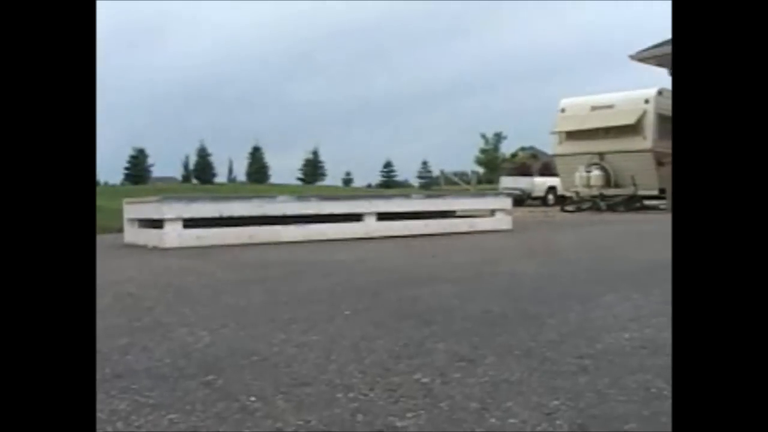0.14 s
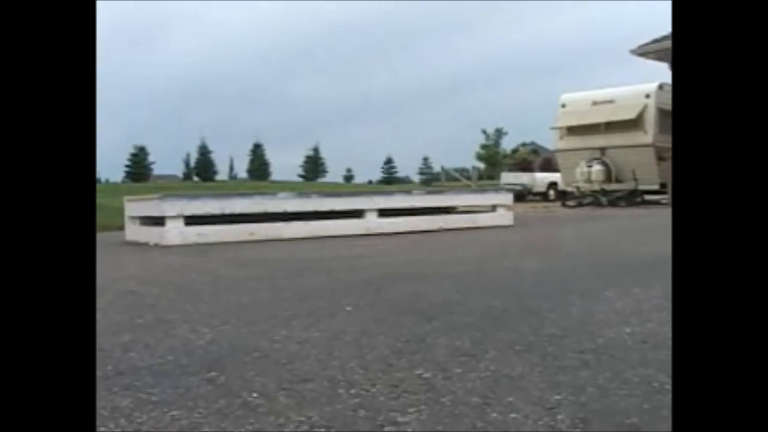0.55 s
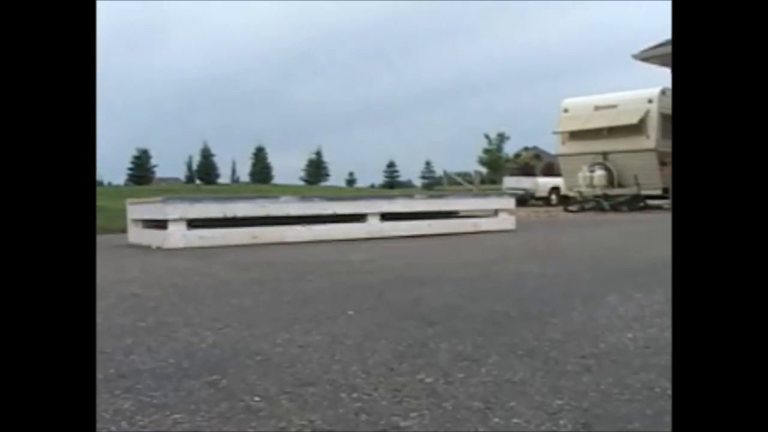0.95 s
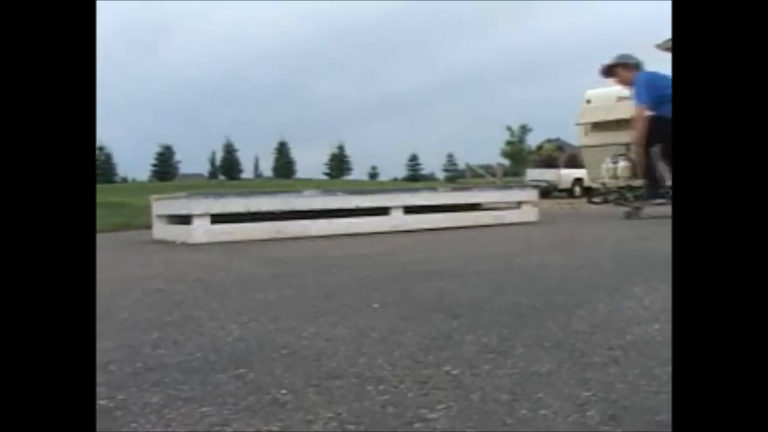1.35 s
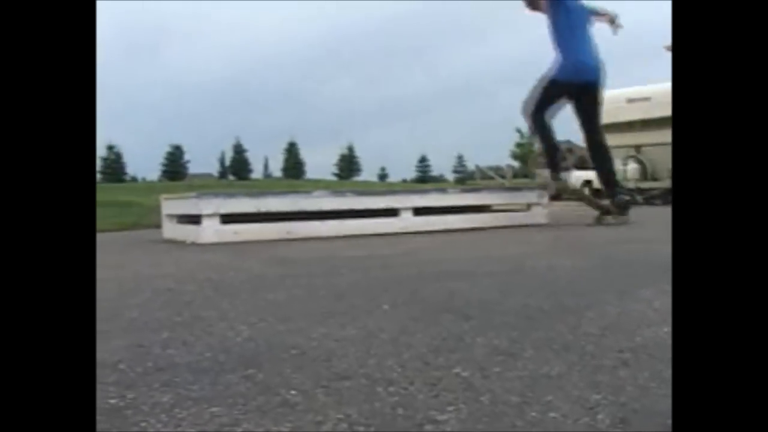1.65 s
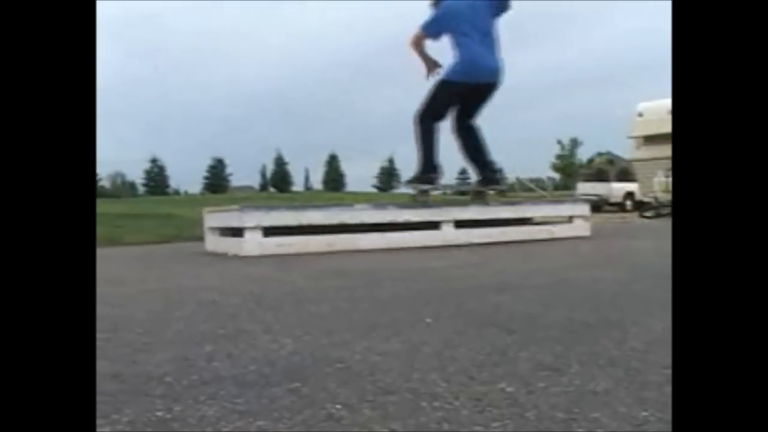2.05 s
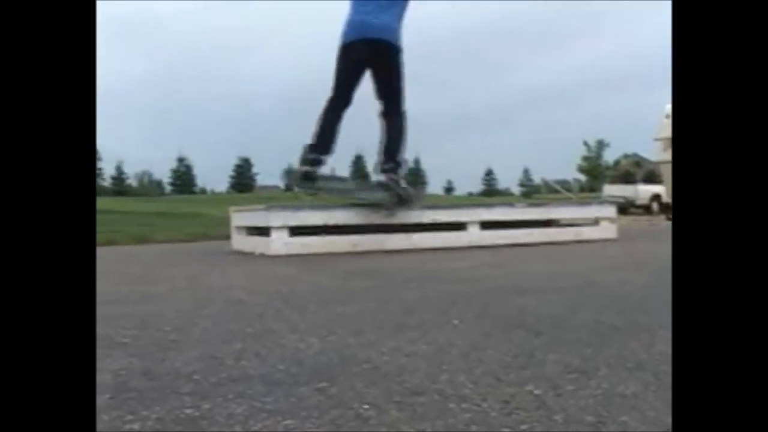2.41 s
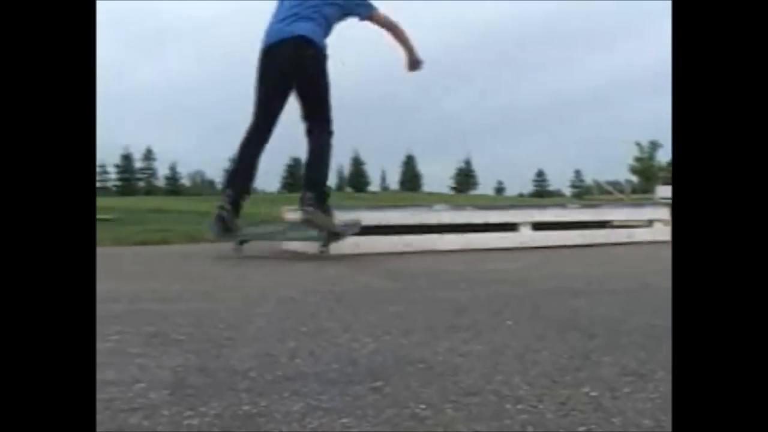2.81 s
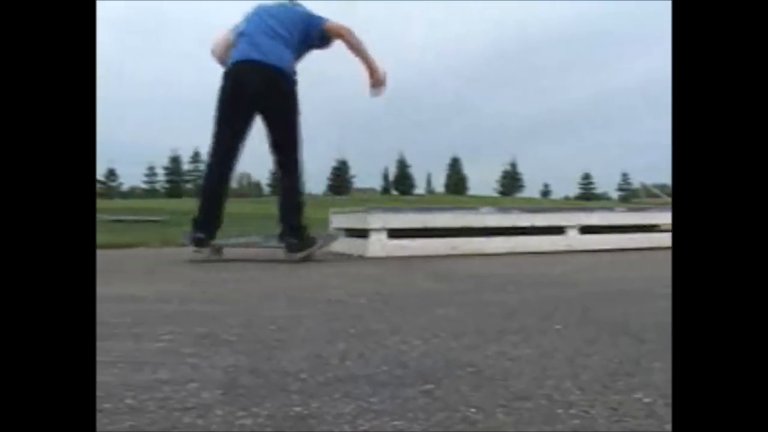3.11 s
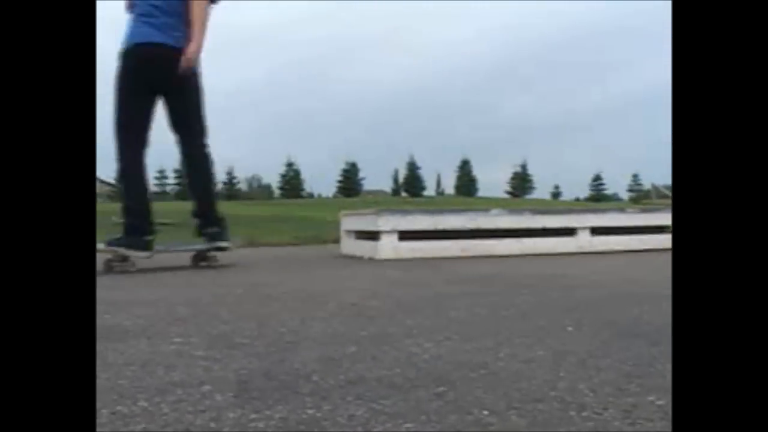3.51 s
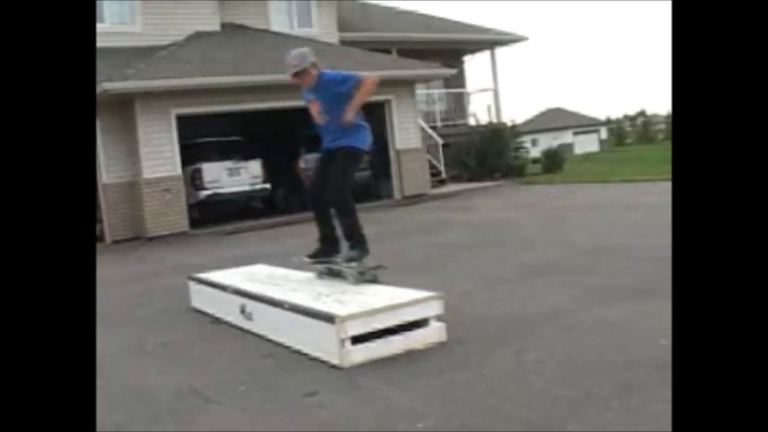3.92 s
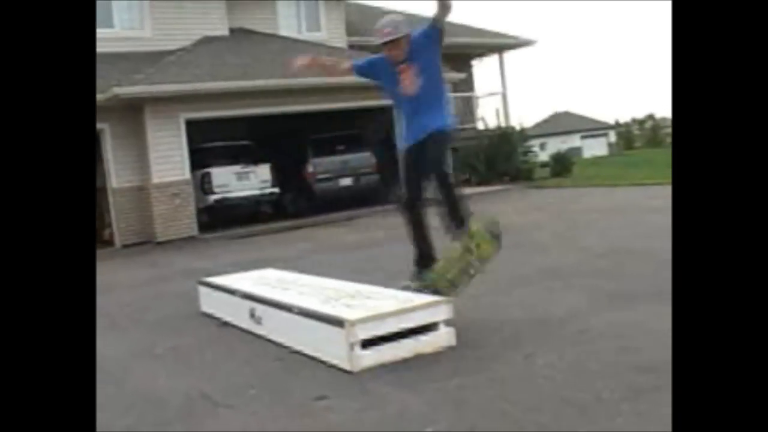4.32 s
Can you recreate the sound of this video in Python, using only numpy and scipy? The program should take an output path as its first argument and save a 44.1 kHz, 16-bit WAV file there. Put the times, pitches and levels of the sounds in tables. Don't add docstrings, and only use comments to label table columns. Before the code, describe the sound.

A skateboard rolls over rough asphalt, pops loudly, clatters and grinds along a hollow wooden box, drops off hard, then bangs along the box again.

```python
import sys
import numpy as np
from scipy import signal
from scipy.fft import rfft, irfft, next_fast_len
from scipy.io import wavfile
from scipy.ndimage import uniform_filter1d, map_coordinates

SR = 44100
rng = np.random.default_rng(int(sys.argv[2]) if len(sys.argv) > 2 else 0)


def invert_db(x):
    u = np.asarray(x, float) / 20
    return 10 ** u


def bounce(signal):
    frames = np.transpose(np.atleast_2d(signal))
    limited = np.clip(frames, -1, 1)
    pcm = np.round(limited * 32767).astype(np.int16)
    wavfile.write(sys.argv[1], SR, pcm)


N = 196641
END_S, SCENE_CHANGE_S = 4.3187, 3.6

# (frequency [Hz], density [dB per Hz])
AIR_SPECTRUM = [(15, -35), (25, 11.5), (124, 10), (314, -6), (488, -1.5), (718, -19.5), (1300, -20),
                (1600, -24.5), (2240, -25), (3750, -47.5), (5670, -18), (10300, -28.5), (11100, -26),
                (12000, -67), (15600, -94), (22000, -120)]
AIR_DB = -35
# (frequency [Hz], correlation [0-1])
LIKENESS = [(60, 0.97), (130, 0.97), (270, 1), (570, 0.9), (1220, 0.86), (2580, 0.62), (5480, 0.65),
            (11600, 0.24)]
# (frequency [Hz], t60 [s])
YARD_DECAY = [(100, 0.083), (1000, 0.32), (4000, 0.45), (11000, 0.013)]

# (time [s], left minus right [dB])
BOARD_PLACE = [(0.0, -4), (0.55, -3.5), (1.05, -2.5), (1.39, -1), (1.73, .5), (1.82, -4), (1.94, -1),
               (2.07, 1), (2.26, -0.5), (2.52, .5), (2.68, -1), (2.84, 1.5), (2.885, -2), (2.93, 1.5),
               (3.0, -5.5), (3.12, 0), (3.4, 2), (4.32, -1)]
# (time [s], delay [samples])
LEFT_LAG = [(0, 4), (.6, 3.4), (.95, 2), (1.25, 0), (4.4, 0)]
# (frequency [Hz], width [Hz], depth [0-1])
GROUND_DIPS = [(1540, 47, 0.04), (3920, 270, 0)]
# (start [s], end [s])
WIDE_STRETCHES = [(0, .7), (.9, 1.08), (1.22, 1.3), (1.62, 1.745), (1.93, 1.955), (1.985, 2.005),
                  (2.32, 2.37), (2.395, 2.41), (2.528, 2.536), (2.82, 3.07), (3.13, 3.16), (3.335, 3.4),
                  (3.48, 3.57), (3.65, 3.67), (3.985, 4.02)]
WIDE_ABOVE_HZ = 3100

# (start [s], end [s], level [dB])
JINGLES = [
    (1.285, 1.608, -41),
    (2.4, 2.464, -23),
    (3.082, 3.354, -45.5),
]
# (frequency [Hz], width [Hz], level [dB])
BEARINGS = [(5200, 970, -2.5), (6600, 1010, 2.5), (7950, 1400, 1.7), (9880, 2000, -4.5)]
JINGLE_FADE_S = 0.018
# (peak time [s], level [dB], pitch [Hz], swell [s], fade [s])
MOANS = [(.955, -26, 364, 0.017, 0.019), (1.04, -30, 1360, .02, 0.026), (1.148, -23, 1350, 0.039, 0.041),
         (1.09, -28, 498, 0.071, 0.034), (1.5, -36, 810, 0.051, 0.068), (1.764, -29, 1228, 0.0082, 0.026),
         (2.16, -21.5, 195, .04, 0.094), (2.8, -21.5, 556, 0.0067, 0.019),
         (3.42, -42.5, 1140, 0.025, 0.063), (3.69, -19, 410, 0.02, 0.065), (2.59, -23.5, 850, 0.016, .03),
         (3.27, -36.5, 920, 0.041, .05), (4.0, -27, 285, .06, .08), (1.605, -32, 2500, .01, .015),
         (1.23, -33, 1950, .02, .04), (2.72, -27, 110, .04, .06), (2.05, -21, 1250, .015, 0.026)]
MOAN_WIDTH = 0.054

# (time [s], load [dB], coarseness [dB])
WHEEL_LOAD = [(0, -30, 1.5), (.17, -33, -1.5), (.26, -28, 0), (.6, -29.5, -0.5), (.92, -30.5, -1.5),
              (1.28, -27, -5.5), (1.47, -24.5, -17.5), (1.64, -27.5, 4), (2.16, -27.5, -3.5),
              (2.3, -28, -6.5), (2.5, -30.5, -2), (2.8, -32, 2), (2.96, -30.5, 2.5), (3.09, -38, 0),
              (3.28, -31, 1.5), (3.78, -31, 4), (3.94, -34.5, 3.5), (4.3, -34, 7.5)]
# (peak time [s], extra load [dB], swell [s], fade [s])
SKIDS = [(.09, 0.5, 0.014, 0.065), (.8, 5, 0.024, 0.06), (1.157, 12, 0.091, 0.072), (1.6, 4, 0.02, 0.058),
         (2.424, 10, 0.047, 0.068), (1.07, 1.5, 0.052, .04), (4.06, 1.5, 0.018, 0.02),
         (4.225, 4, 0.021, 0.029), (.96, 5.5, 0.0064, 0.1), (1.38, -0.5, .05, 0.088),
         (3.25, -0.5, .05, .03)]
# (take-off [s], touch-down [s], loss [dB])
FLIGHTS = [
    (1.627, 1.712, -7.5),
    (1.778, 1.936, -14.5),
    (2.8, 2.83, -30.5),
    (3.35, 3.611, -11.5),
]
SPIN_DOWN_S, TOUCH_S = 0.044, .003
# (frequency [Hz], width [Hz], level [dB])
TARMAC_MODES = [(102.6, 41, -1.5), (148, 54, 7), (238, 256, 2.5)]
# (frequency [Hz], width [Hz], level [dB])
HUM_MODES = [(348.6, 65, 4), (508, 98, 3.5), (742, 155, -4.5), (870, 84, -7.5)]
# (frequency [Hz], width [Hz], level [dB])
DECK_MODES = [(940, 410, -2), (1161, 153, 4), (1273, 190, 0.5), (1958, 240, -4.5), (2360, 890, -16.5)]
# (frequency [Hz], density [dB per Hz])
GRIT_SPECTRUM = [(1290, -36), (2200, 6.5), (3540, -2.5), (4870, 1), (6520, -5.5), (7050, -5), (10100, -11),
                 (11700, -15), (12000, -32), (15600, -79), (22000, -120)]
DRUM_DB, HUM_DB, DECK_DB, GRIT_DB = -9.5, -1.5, 1, -8.5
BOX_DRUM_DB, BOX_HUM_DB, BOX_GRIT_DB = 8.5, 2.5, -5
SKID_DRUM, SKID_HUM, SKID_GRIT = 0.28, 0.59, 1.2
COARSE_DECK = 0.52

# (time [s], peak [dB], pitch [Hz], t60 [s])
BOARD_RINGS = [(1.734, 8, 1403, 0.023), (1.938, -2, 1105, 0.11), (2.12, -12, 1140, 0.097),
               (2.5313, -6, 1200, 0.076), (2.579, -7, 1420, 0.062), (3.348, -5, 1300, 0.021),
               (3.9951, -6, 1010, 0.12), (2.329, 2.5, 520, 0.041), (2.345, -2.5, 460, 0.16),
               (2.436, -3.5, 440, 0.087), (2.566, -4.5, 188.5, 0.21), (3.673, -6.5, 510, 0.068),
               (3.67, -8.5, 230, 0.18), (3.752, -6, 144, 0.14), (3.85, -9.5, 201, 0.18),
               (4.005, -1.5, 590, 0.049), (4.257, -15, 146, 0.089), (3.622, -5, 418, 0.11),
               (2.547, -1, 150, .09), (2.012, -5.5, 118, .13), (2.434, -7.5, 97, .1),
               (1.953, -16, 110, .15), (2.8, -6.5, 620, .04), (3.6585, -1, 1900, .03),
               (3.704, -9.5, 1900, .02), (4.1, -5.5, 1930, 0.0302), (3.8485, -5, 1780, 0.023),
               (4.2765, -6, 1600, 0.033), (2.9005, 1.5, 2300, 0.017), (3.619, -4.5, 170, .06),
               (2.0, -4.5, 480, .04), (3.3, -2, 1800, 0.028), (1.7322, -5, 3100, .012),
               (1.7325, -7, 4500, .01), (2.2, -8, 2300, 0.011), (2.542, -6, 1400, .04)]

# (time [s], crack peak [dB], steel click [dB], rattle t60 [s])
TICKS = [(.2418, -21.5, -36, .03), (.281, -16, -36, .03), (.3147, -23.5, -29.5, .02),
         (.4045, -20.5, -36, .03), (.4918, -26, -48, 0.018), (.5756, -17.5, -40, 0.018),
         (.7372, -26, -25.5, .03), (.834, -18.5, -31, .015), (.8849, -22.5, -29, .02),
         (.9527, -22.5, -31, .04), (.9996, -22, -23, .04), (1.048, -18.5, -23, 0.055),
         (1.3623, -27, -29, .03), (1.428, -27, -28, .02), (1.773, -13.5, -30.5, .04),
         (2.335, -7.5, -18, .03), (2.942, -11.5, -21, 0.032), (2.9799, -24.5, -33, .04),
         (3.0921, -27, -31, .02), (3.2443, -19.5, -34, .03), (3.4309, -26, -27.5, 0.033),
         (3.4922, -38, -34, .02), (3.565, -38.5, -33, .03), (4.2219, -19, -29, .04),
         (4.3, -16.5, -31.5, 0.051)]
# (time [s], crack peak [dB], steel click [dB], rattle t60 [s])
ROAD_CLACKS = [(.4439, -17.5, -48, 0.031), (0.5455, -16, -45, 0.11), (0.694, -9, -25, 0.014),
               (0.857, -15.5, -23, 0.034), (1.5964, -15, -19.5, 0.14), (1.634, -15, -14, 0.049),
               (1.7316, 3.5, -9, 0.045), (1.749, -29.5, -30, 0.12), (1.9111, -48.5, -48, .015),
               (2.832, 4.5, -10, 0.03), (2.8424, -5, -19.5, 0.072), (2.8837, -8, -20, 0.079),
               (2.8944, -10, -30, 0.06), (2.8994, 2.5, -11.5, 0.041), (2.9262, -1.5, -16, 0.06),
               (2.9282, -2, -16.5, 0.053), (3.048, -34, -23, 0.027), (3.1377, -19, -19.5, .02),
               (3.1623, -19.5, -41.5, 0.069), (3.223, -24, -22, 0.024), (3.298, -44, -23.5, 0.054),
               (3.341, -2, -9, 0.026), (3.35, -16.5, -18.5, 0.075), (3.3883, -10.5, -22, 0.057),
               (3.591, -22, -18.5, 0.013)]
# (time [s], crack peak [dB], steel click [dB], rattle t60 [s])
BOX_CLACKS = [(1.938, -3, -6.5, 0.059), (1.9505, -6, -26.5, 0.015), (1.9918, 1.5, -4, 0.043),
              (2.0465, -9, -21, .12), (2.0621, -16, -27.5, 0.38), (2.1185, -14, -34, 0.14),
              (2.307, -19, -40, 0.1), (2.3275, -8, -36, 0.16), (2.3553, -2.5, -32, 0.02),
              (2.4017, -12, -15.5, 0.076), (2.532, -6, -17.5, 0.028), (2.542, -11, -14.5, 0.041),
              (2.5783, -21, -49, 0.044), (2.6005, -17, -45, 0.043), (2.63, -16, -12, 0.044),
              (2.7907, -17, -27, 0.093), (3.6192, -10.5, -19.5, 0.025), (3.6577, 1.5, -7.5, 0.042),
              (3.6713, -6, -28.5, 0.03), (3.7024, -10.5, -23, 0.11), (3.742, -9.5, -42, 0.062),
              (3.8482, -4.5, -42, 0.033), (3.905, -20, -31.5, 0.043), (3.94, -20.5, -27.5, 0.033),
              (3.968, -13, -21.5, 0.07), (3.996, -2, -11.5, 0.077), (4.0367, -8, -18, 0.036),
              (4.151, -26, -45, .04), (4.2463, 0, -20, 0.033), (4.276, -3.5, -26, 0.059)]
# (start [s], crack pitch [Hz], steel ring [Hz])
STRIKING_PARTS = [(-1, 1400, 5220), (.5, 2170, 5760), (.65, 1700, 4640), (1.5, 2450, 7500),
                  (1.7, 2600, 4500), (1.742, 2300, 6800), (1.925, 2800, 5510), (1.97, 2200, 6090),
                  (2.02, 2400, 5140), (2.09, 1900, 4460), (2.32, 2800, 7950), (2.345, 2500, 7300),
                  (2.38, 2300, 6610), (2.5, 2700, 4340), (2.615, 2900, 7400), (2.81, 1980, 4300),
                  (2.87, 2500, 5400), (2.889, 1740, 5260), (2.897, 2380, 4370), (2.915, 1950, 7500),
                  (3.0, 2000, 5300), (3.11, 2000, 7900), (3.32, 1740, 6880), (3.37, 2210, 5310),
                  (3.53, 1700, 7200), (3.64, 1900, 5330), (3.8, 1840, 4220), (3.955, 1600, 4960),
                  (4.02, 2600, 4860), (4.26, 1530, 4640)]
# (frequency [Hz], level [dB])
CLICK_SPECTRUM = [(2500, -26.5), (3600, -12.5), (4800, -2), (6500, -9), (8000, -5.5), (10500, -15),
                  (12000, -19)]
STEEL_DB, STEEL_WIDTH = 4, .06

# (frequency [Hz], width [Hz], level [dB])
UPPER_MODES = [(769, 85, 0), (886, 8, 4.5), (1010, 105, -2), (1105, 30, -1), (1287, 560, -7),
               (1323, 117, -6.5), (1466, 90, -2.5), (1816, 98, -7), (2460, 1000, -22)]
# (frequency [Hz], width [Hz], level [dB])
LOWER_MODES = [(298, 23, -14), (349.5, 58, -4), (415, 24, 3), (480, 290, -5), (550.4, 30, 4.5),
               (594, 17, -20)]
# (frequency [Hz], width [Hz], level [dB])
PANEL_MODES = [(137.5, 16.3, 3), (196.9, 4.8, 2.5), (250.3, 5.1, -7)]
# (frequency [Hz], width [Hz], level [dB])
BOOM_MODES = [(89.3, 12, -11.5), (96.9, 4.5, -0.5), (107.6, 19.3, 1), (116.5, 26, -0.5)]
# (time [s], deck blow [dB], weight behind it [dB], shake t60 [s])
SLAPS = [
    (.694, -17.5, -36, 0.031),
    (1.636, -35, -26, 0.024),
    (1.733, -1.5, -19.5, 0.031),
    (2.834, -2.5, -12, 0.041),
    (2.894, -9.5, -20, 0.082),
    (2.927, -7, -14.5, 0.044),
    (3.296, -41.5, -25, 0.029),
    (3.343, -12.5, -36.5, 0.027),
    (3.386, -17, -19, 0.029),
]
# lower wood, panel, boom [dB]
SLAP_SINKS_DB = [3.5, -17, -32.5]
# (time [s], top sheet blow [dB], hollow body [dB], shake t60 [s])
LANDINGS = [(1.938, 0.5, -9.5, 0.029), (1.952, -3.5, -13, 0.2), (1.992, 0, -18, 0.068),
            (2.01, -7.5, -17, 0.18), (2.044, -9.5, -20, 0.21), (2.092, -13, -18, 0.13),
            (2.119, -11.5, -19, 0.12), (2.329, -5.5, -12, 0.13), (2.357, -6, -12.5, 0.098),
            (2.38, -12, -15, 0.046), (2.404, -13, -12, 0.046), (2.433, -11, -40, .093),
            (2.531, -0.5, -16, 0.09), (2.544, -6.5, -17.5, 0.058), (2.58, -10.5, -19, 0.25),
            (2.599, -26.5, -33, 0.085), (2.629, -9, -14.5, 0.043), (2.789, -14.5, -40, 0.16),
            (3.618, -7.5, -7, 0.096), (3.632, -11.5, -23, 0.14), (3.661, -5, -20, 0.04),
            (3.673, -3, -11, 0.074), (3.707, -19.5, -20.5, 0.19), (3.742, -7, -15, 0.027),
            (3.846, -14, -32, 0.067), (3.963, -22.5, -25, 0.093), (3.994, -3.5, -15, 0.064),
            (4.037, -12.5, -26, 0.14), (4.248, -10.5, -19.5, 0.14), (4.275, -12.5, -33, 0.054)]
LOWER_DB, PANEL_DB, BOOM_DB = -7.5, 3.5, 1
# change of upper, lower, panel, boom [dB]
SECOND_VIEW_DB = [0.1, 0.1, 3.5, -8.5]
MODE_LAG = (10, 40, 420, 560)
SOFT = 5.3
BOX_WIDE = .22
FLANK_S, FLANK_DB = 0.0005, -18.5


def unit(x):
    return x / np.sqrt(np.mean(x ** 2) + 1e-20)


def along(points, hz):
    f, v = np.transpose(points)
    return np.interp(np.log(hz + 1), np.log(f + 1), v)


def curves(rows):
    s, *cols = np.transpose(rows)
    return [np.interp(np.arange(N) / SR, s, c) for c in cols]


def wobble(rate):
    knots = rng.standard_normal(int(N * rate / SR) + 4)
    return map_coordinates(knots, [np.arange(N) * rate / SR])


def filtered(x, response):
    m = next_fast_len(x.shape[-1] + SR // 2)
    return irfft(rfft(x, m) * response(np.fft.rfftfreq(m, 1 / SR)), m)[..., :x.shape[-1]]


def resonant(peaks):
    def response(f):
        return sum((-1) ** k * invert_db(db) * 1j * f * w / (c * c - f * f + 1j * f * w)
                   for k, (c, w, db) in enumerate(peaks))
    return response


def spread(pair, alike):
    def mid_side_gains(hz):
        turn = np.arccos(np.clip(along(alike, hz), -1, 1)) / 2
        return np.array([np.cos(turn), np.sin(turn)])
    mid, side = filtered(pair, mid_side_gains)
    return np.array([mid + side, mid - side])


def chatter(rate, scatter_db, smooth):
    hit = rng.random((2, N)) < rate / SR
    taps = hit * rng.standard_normal((2, N))
    taps = taps * invert_db(scatter_db * np.minimum(rng.exponential(size=(2, N)), 3))
    return unit(taps) + smooth * rng.standard_normal((2, N))


def patchy(x, depth_db):
    z = signal.stft(x, nperseg=512)[2]
    field = rng.standard_normal(z.shape[1:])
    field = uniform_filter1d(uniform_filter1d(field, size=8, axis=0), size=5, axis=1)
    gain = invert_db(depth_db * unit(field))
    return signal.istft(z * unit(gain), nperseg=512)[1][:, :N]


def placed(x):
    pan_db, lag = curves(BOARD_PLACE)[0], curves(LEFT_LAG)[0]
    body = filtered(x[0], lambda hz: 1 / (1 + (hz / 5000) ** 4))
    late_body = np.interp(np.arange(N) - lag, np.arange(N), body)
    left = x[0] - body + late_body
    return invert_db([pan_db / 2, -pan_db / 2]) * [left, x[1]]


def air():
    hush = filtered(rng.standard_normal((2, N)), lambda hz: invert_db(along(AIR_SPECTRUM, hz)))
    swell = invert_db(1.2 * wobble(5))
    return invert_db(AIR_DB - 1.5) * swell * unit(spread(hush, LIKENESS))


def buffet():
    t = np.clip(np.arange(N) / SR - 1.733, 0, None) / 0.014
    puff = filtered(rng.standard_normal((2, N)), lambda hz: (hz / 52) ** 3 / (1 + (hz / 52) ** 8))
    push = t * (1 - t / 2) * np.exp(-t) * [[1.3], [.7]]
    return invert_db(-54.5) * unit(puff) + invert_db(-10.0) * push


def yard(x):
    hz, t, z = signal.stft(rng.standard_normal((2, SR // 2)), SR, nperseg=256)
    decay = invert_db(-60 * t / along(YARD_DECAY, hz)[:, None])
    tail = signal.istft(z * decay, SR, nperseg=256)[1]
    tail = tail / np.linalg.norm(tail[0])
    return signal.fftconvolve(np.pad(x, (200, 0))[None], tail, axes=1)[:, :N]


def jingle():
    s = np.arange(N) / SR
    gate = sum(invert_db(db) * np.clip(np.minimum(s - a, b - s) / JINGLE_FADE_S, 0, 1) for a, b, db in JINGLES)
    taps = chatter(rate=3200, scatter_db=1.5, smooth=0.76)
    ticks = unit(filtered(taps, lambda hz: resonant(BEARINGS)(hz) * hz / (hz + 4000)))
    return spread(ticks * gate * invert_db(2.3 * wobble(50.1)), LIKENESS)


def moans():
    out, t = np.zeros(N + SR), np.arange(-SR // 4, SR // 4) / SR
    for s, db, hz, swell, fade in MOANS:
        noise = rng.standard_normal(len(t))
        hum = unit(filtered(noise, lambda f: resonant([(hz, MOAN_WIDTH * hz, 0)])(f) ** 2))
        envelope = np.exp(-(t / np.where(t < 0, swell, fade)) ** 2)
        out[round(s * SR) - SR // 4:][:len(t)] += invert_db(db) * hum * envelope
    return out[:N]


def rolling():
    load_db, coarse_db = curves(WHEEL_LOAD)
    s, bumps = np.arange(N) / SR, wobble(28.49)
    skid_db = sum(db * np.exp(-((s - peak) / np.where(s < peak, swell, fade)) ** 2)
                  for peak, db, swell, fade in SKIDS)
    for up, down, db in FLIGHTS:
        airborne = np.clip(np.minimum((s - up) / SPIN_DOWN_S, (down - s) / TOUCH_S), 0, 1)
        load_db = load_db + db * airborne
    on_box = ((s > 1.93) & (s < 2.82)) | (s > SCENE_CHANGE_S)
    drum_db = load_db + DRUM_DB + BOX_DRUM_DB * on_box + SKID_DRUM * skid_db
    hum_db = load_db + HUM_DB + BOX_HUM_DB * on_box + SKID_HUM * skid_db
    deck_db = load_db + DECK_DB + COARSE_DECK * coarse_db + skid_db
    grit_db = load_db + GRIT_DB + BOX_GRIT_DB * on_box + coarse_db + SKID_GRIT * skid_db

    lows = chatter(rate=200, scatter_db=-1.0, smooth=2.0)
    box_drum = .5 * unit(filtered(lows, resonant(BOOM_MODES + PANEL_MODES)))
    drum = np.where(on_box, box_drum, unit(filtered(lows, resonant(TARMAC_MODES))))
    stones = chatter(rate=1200, scatter_db=2.5, smooth=0.99)
    hum = unit(filtered(stones, resonant(HUM_MODES))) * invert_db(hum_db - 2.0 + 0.27 * wobble(29))
    deck = unit(filtered(stones, resonant(DECK_MODES)))
    deck = deck * invert_db(deck_db - 2.0 + 1.6 * bumps + 0.44 * wobble(46))
    fine = chatter(rate=2500, scatter_db=-1.0, smooth=0.84)
    grit = unit(filtered(fine, lambda hz: invert_db(along(GRIT_SPECTRUM, hz))))
    grit = grit * invert_db(.8 * wobble(45))
    drum = drum * invert_db(drum_db + 6.0 + 0.48 * wobble(7.4))
    grit = grit * invert_db(grit_db + 2.5 + 0.39 * bumps)
    return spread(drum + hum + deck + grit, LIKENESS)


def rings():
    out, t = np.zeros(N + SR), np.arange(SR // 4) / SR
    for s, db, hz, t60 in BOARD_RINGS:
        envelope = invert_db(db - 4.0 - 60 * t / t60) * (1 - np.exp(-t / 0.00084))
        out[round(s * SR):][:len(t)] += envelope * np.sin(2 * np.pi * hz * t)
    return out[:N]


def clacks(contacts):
    crack, click, t = np.zeros(N + SR), np.zeros(N + SR), np.arange(SR // 5) / SR
    for s, crack_db, click_db, t60 in contacts:
        pitch, ring = [part[1:] for part in STRIKING_PARTS if part[0] <= s][-1]
        luck = rng.standard_normal((2, len(t)))
        rattle = invert_db(-7 - 60 * t / max(t60, .006))
        snap = (invert_db(-60 * t / 0.0072) + rattle) * np.minimum(t / 0.00095, 1)
        tone = filtered(snap * luck[0], resonant([(pitch, .2 * pitch, 5), (2300, 2200, -3)]))
        steel_mode = resonant([(ring, STEEL_WIDTH * ring, STEEL_DB)])
        steel = filtered(snap * luck[1], lambda hz: 0.5 + steel_mode(hz))
        crack[round(s * SR):][:len(t)] += invert_db(crack_db + 8.0) * tone
        click[round(s * SR):][:len(t)] += invert_db(click_db + 10.0) * steel
    return crack[:N] + filtered(click[:N], lambda hz: invert_db(along(CLICK_SPECTRUM, hz)))


def thuds():
    groups = (UPPER_MODES, LOWER_MODES, PANEL_MODES, BOOM_MODES)
    all_modes = sum(groups, [])
    member = np.repeat(range(4), [len(g) for g in groups])
    force, t = np.zeros((len(member), N + SR // 2)), np.arange(SR // 4) / SR
    blows = [(s, db, *np.add(weight_db, SLAP_SINKS_DB), t60) for s, db, weight_db, t60 in SLAPS]
    blows += [(s, db, db + LOWER_DB, body_db + PANEL_DB, body_db + BOOM_DB, t60)
              for s, db, body_db, t60 in LANDINGS]
    for s, *levels_db, t60 in blows:
        levels_db = np.add(levels_db, np.multiply(SECOND_VIEW_DB, s > SCENE_CHANGE_S))
        envelope = invert_db(-60 * t / np.clip(t60, .01, .25)) * (1 - np.exp(-t / 0.0025))
        shake = [[1], [.8], [.35], [.35]] * envelope * rng.standard_normal((4, len(t)))
        shake[range(4), MODE_LAG] += [9.7, 9.8, 4.7, 6.5]
        spot = invert_db(3.0 * rng.standard_normal(len(member))) * rng.choice([-1, 1], len(member))
        gain = spot * invert_db(np.add(levels_db, [10.1, 18.2, 25.1, 33.3]))[member]
        force[:, round(s * SR):][:, :len(t)] += gain[:, None] * shake[member]
    modes = [filtered(f[:N], lambda hz: resonant([mode])(hz) / (1 + 1j * hz / (SOFT * mode[0])) ** 2)
             for f, mode in zip(force, all_modes)]
    lean = [BOX_WIDE * (-1) ** k * min(hz / 900, 1) for k, (hz, _, _) in enumerate(all_modes)]
    return np.sum(modes, 0), np.dot(lean, modes)


def scene():
    edges = clacks(ROAD_CLACKS + BOX_CLACKS)
    wood, wood_side = thuds()
    hits = edges + wood + rings()
    far = filtered(yard(hits), lambda hz: hz / (hz + 700))
    flank = invert_db(FLANK_DB) * np.roll(hits, round(FLANK_S * SR))
    pair = spread(np.array([hits, flank]), LIKENESS) + [wood_side, -wood_side]
    wheels = rolling()
    near = placed(pair * invert_db(0.62) + jingle()) + invert_db(-13) * far + air()
    wind = buffet()
    small_parts = np.tile(clacks(TICKS) + moans(), (2, 1))
    near = near + placed(small_parts + patchy(wheels, depth_db=2.0))

    def ground(hz):
        return np.prod([1 - depth / (1 + ((hz - c) / w) ** 2) for c, w, depth in GROUND_DIPS], axis=0)

    def rolloff(hz):
        return (1j * hz / 70) ** 2 / (1 + 1.4j * hz / 70 - (hz / 70) ** 2)

    return filtered(near, lambda hz: -ground(hz) * rolloff(hz)) + wind


def folded(x):
    s = np.arange(N) / SR
    side = filtered((x[0] - x[1]) / 2, lambda hz: hz > WIDE_ABOVE_HZ)
    side = side * (1 - sum((s >= a) & (s < b) for a, b in WIDE_STRETCHES))
    return x - [side, -side]


def roll_off(x):
    return signal.sosfilt(signal.butter(12, 12220, fs=SR, output="sos"), x)


def record(dry):
    first, second = (filtered(dry, lambda hz: 1 / (1 + (hz / top_hz) ** 200)) for top_hz in (11450, 11950))
    second = filtered(second, lambda hz: 1 - .5 / (1 + ((hz - 3500) / 450) ** 2))
    x = np.where(np.arange(N) < SCENE_CHANGE_S * SR, first, second)
    x = x / (1 + np.abs(x / 1.02) ** 16) ** (1 / 16)
    mix = folded(x) * (np.arange(N) < END_S * SR)
    return roll_off(mix)


dry = scene()
out = record(dry)
bounce(out)
```